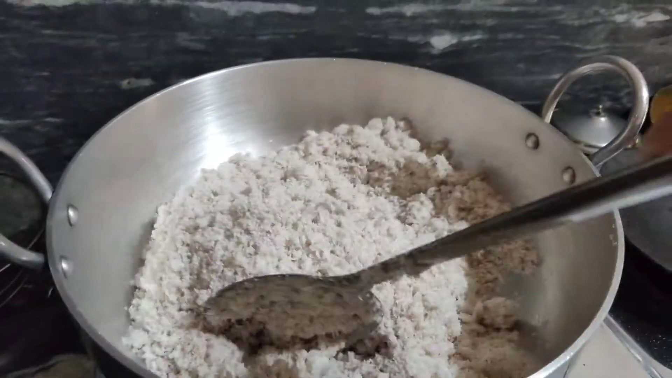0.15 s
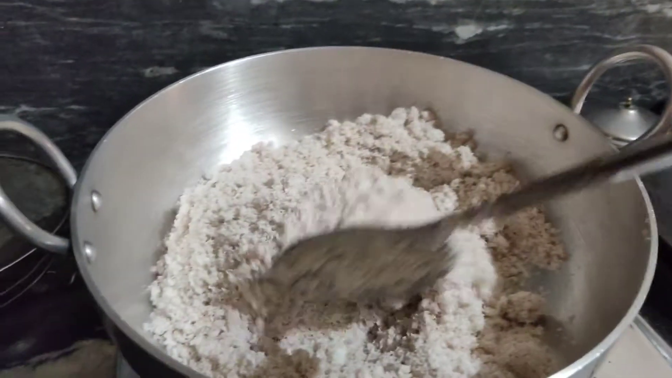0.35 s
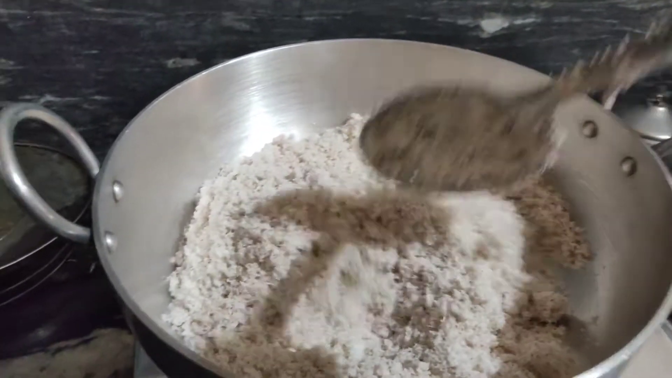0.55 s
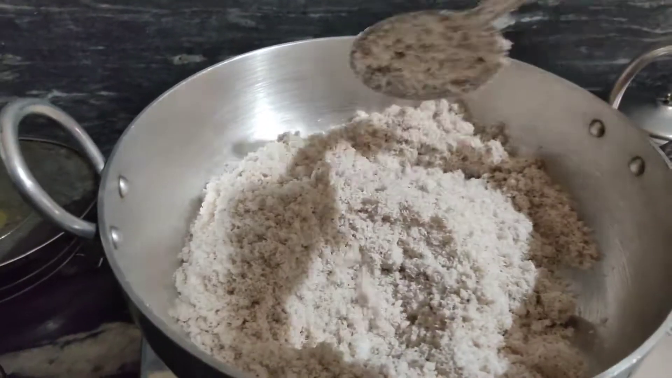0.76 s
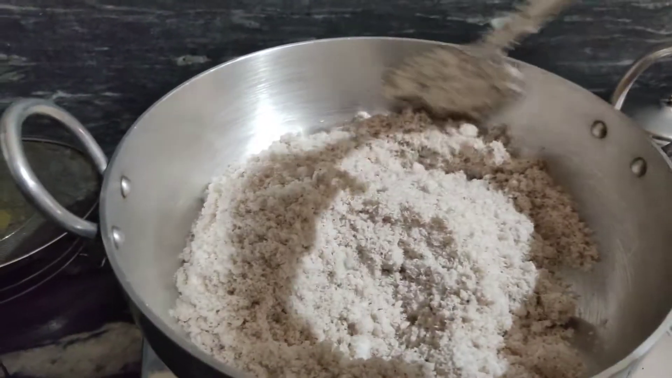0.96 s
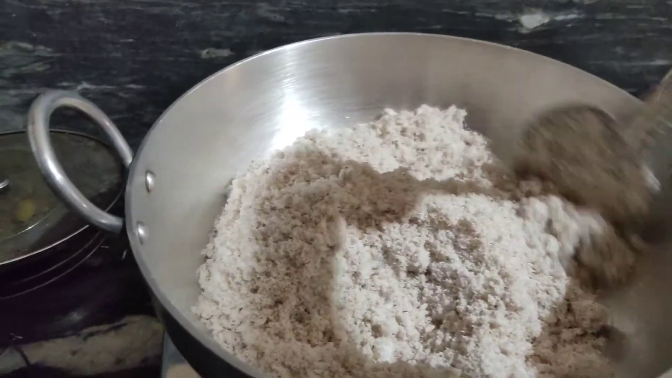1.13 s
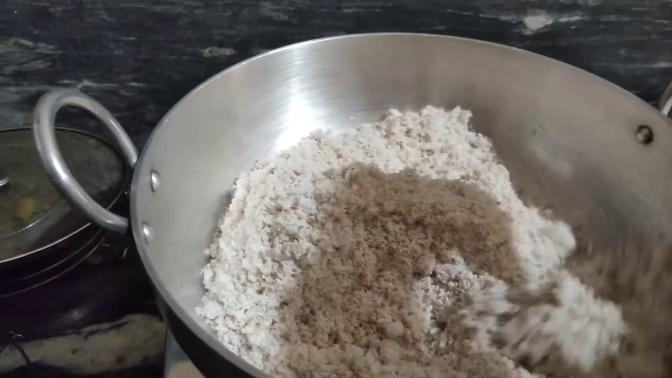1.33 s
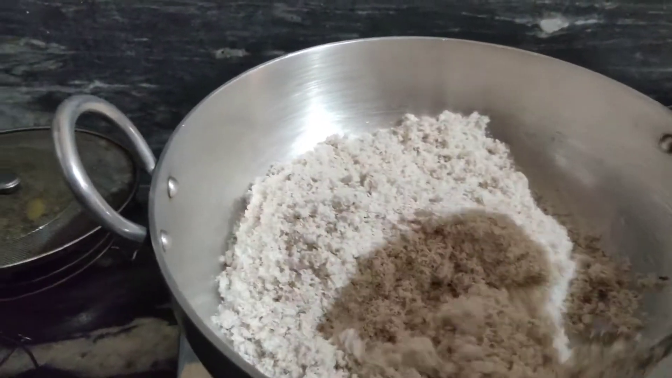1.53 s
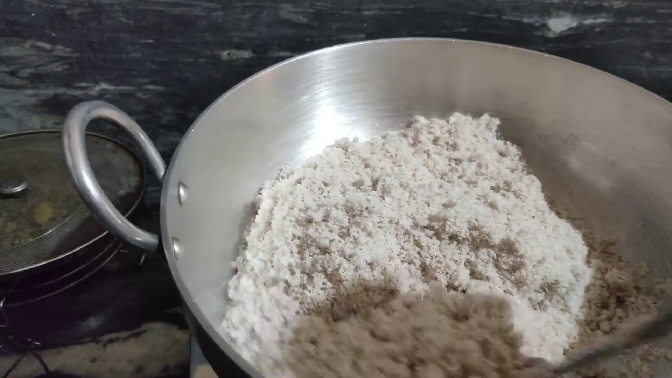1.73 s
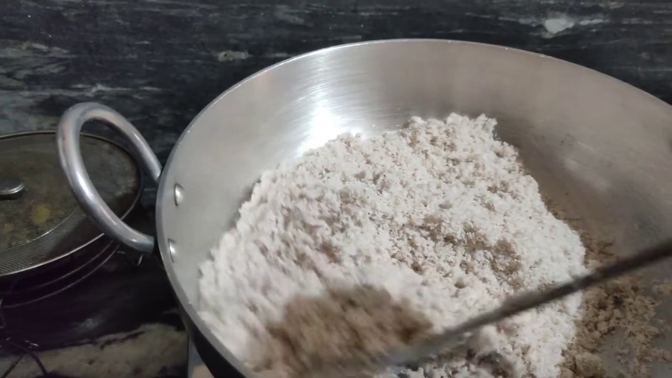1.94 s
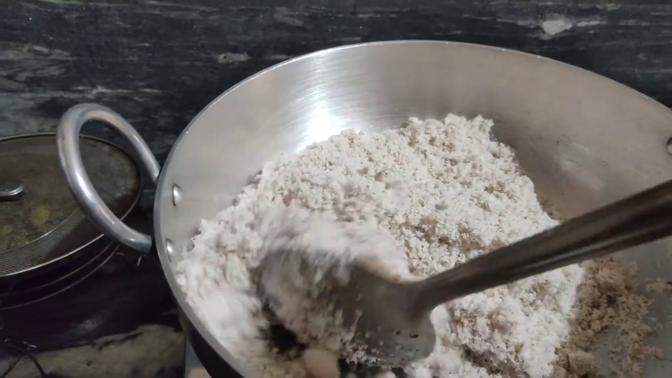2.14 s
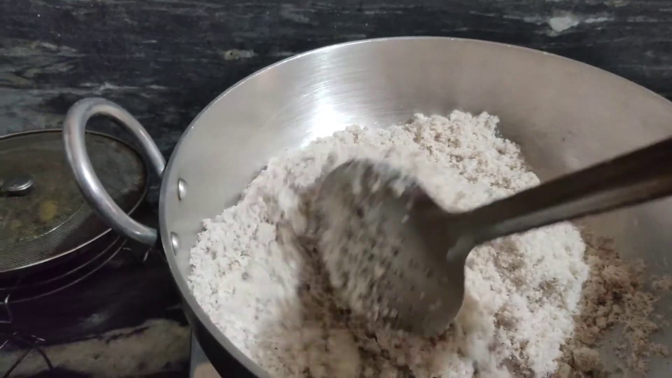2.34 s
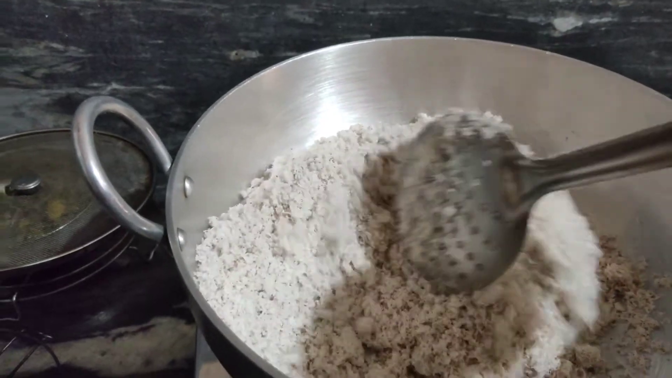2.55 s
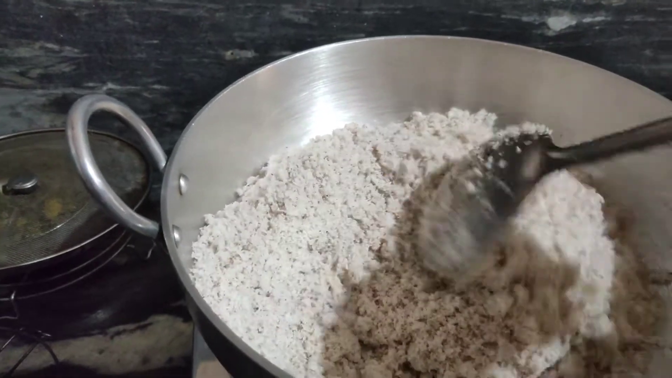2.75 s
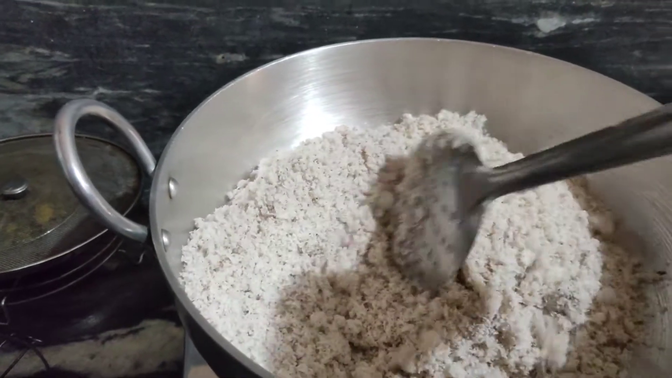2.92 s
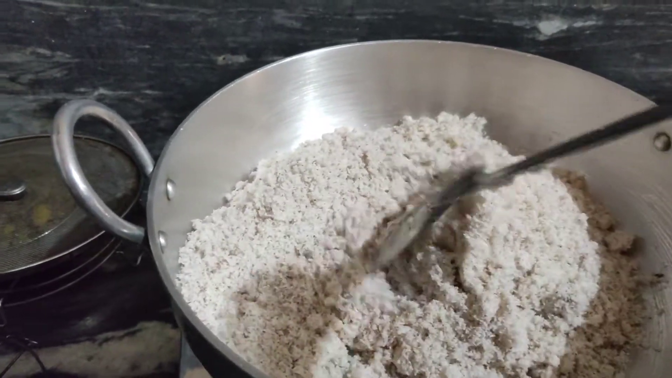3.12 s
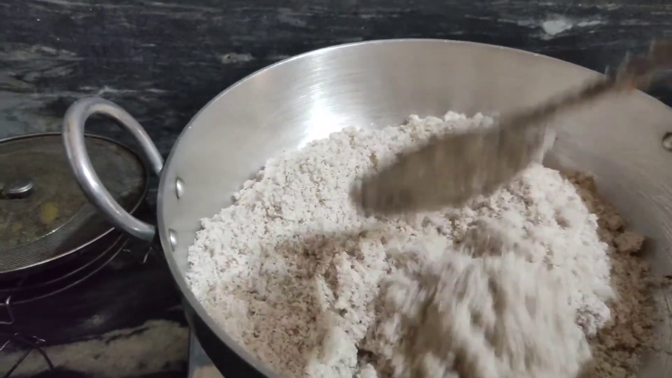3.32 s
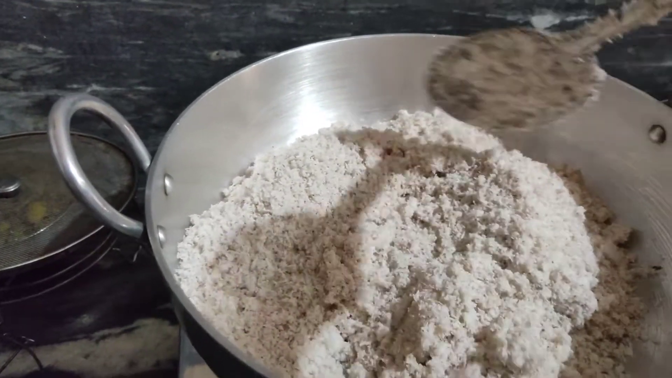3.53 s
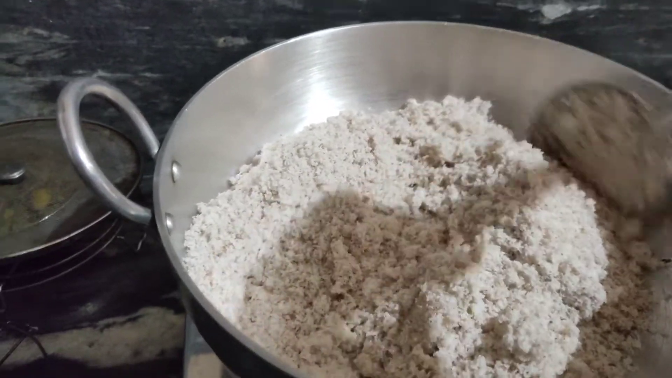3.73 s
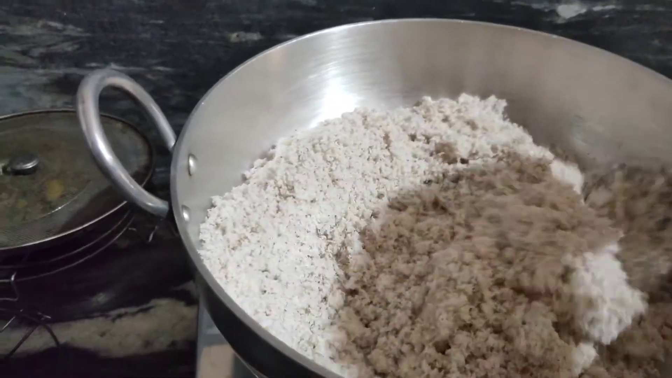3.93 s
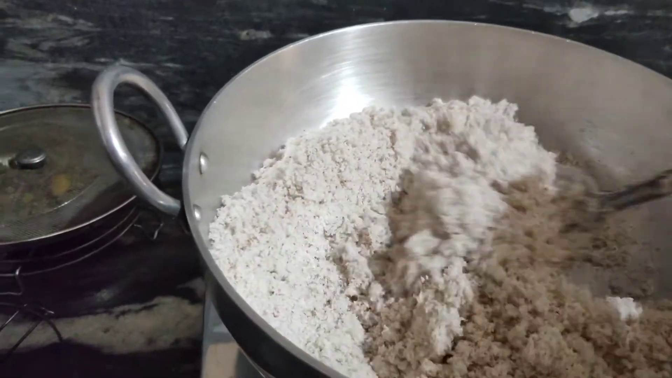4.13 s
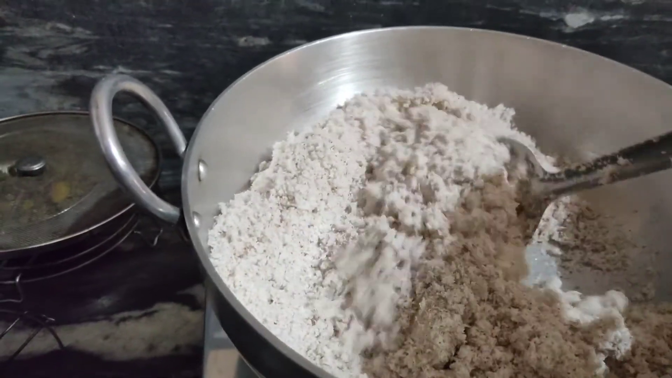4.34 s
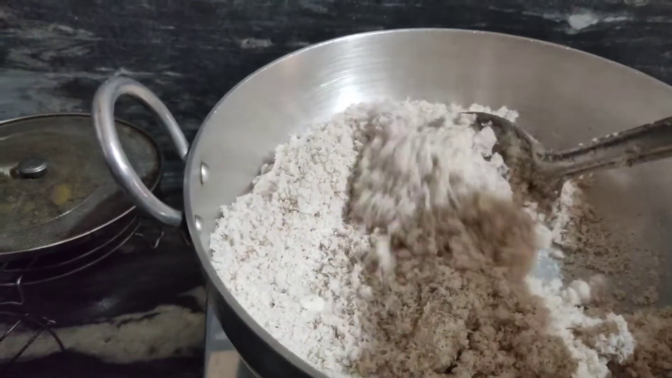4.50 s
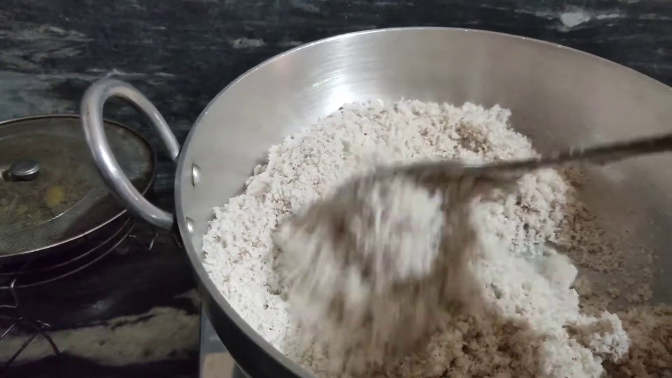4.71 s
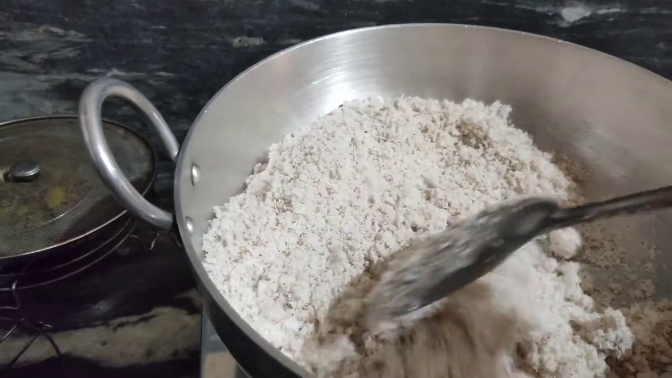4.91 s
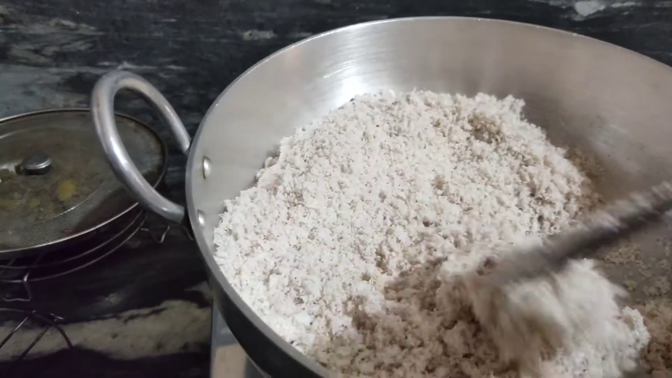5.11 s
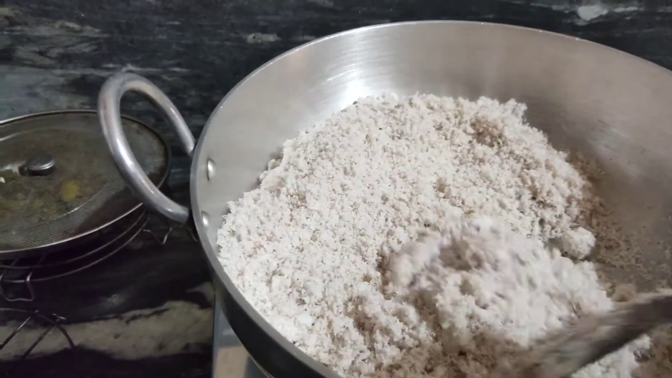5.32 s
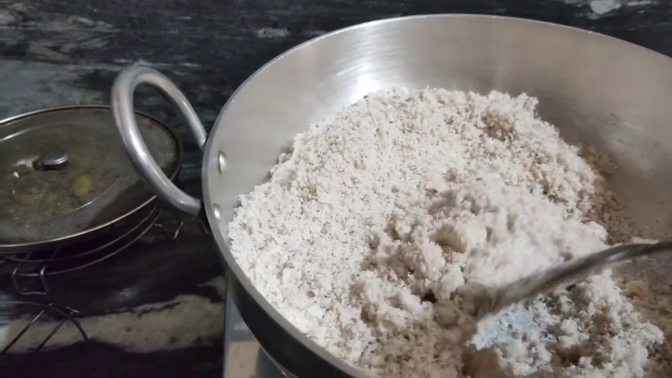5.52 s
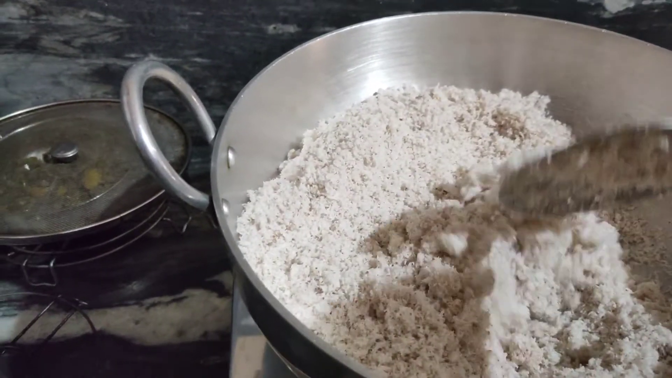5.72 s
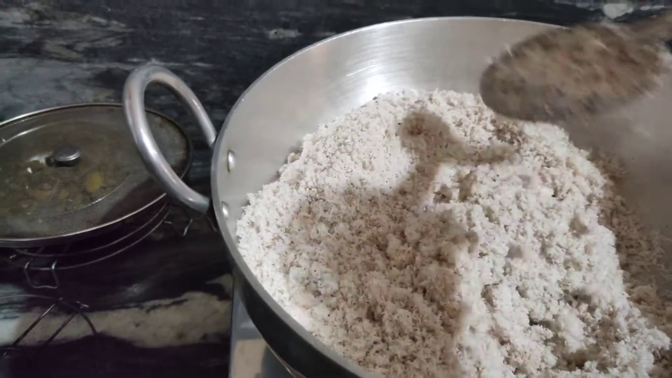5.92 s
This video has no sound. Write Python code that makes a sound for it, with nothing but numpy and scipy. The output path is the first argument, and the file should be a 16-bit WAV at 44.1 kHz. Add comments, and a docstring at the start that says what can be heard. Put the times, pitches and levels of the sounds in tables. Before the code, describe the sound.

Close stereo pickup in a small kitchen. Faint rumble and a tiny bright metallic tick come first, then the sound cuts out briefly. A rattling, gritty ladle scrape follows in a steel pan, then near quiet with soft crumb rustles. A much harder clang starts a second scraping burst with a short hum, and a smaller knock comes near the end.

```python
"""A small kitchen, close to a two-port microphone: a metal ladle knocks and scrapes a steel pan of dry crumbs.
Grit and knocks push noise through the resonances of the pan; hard blows add wide shudders and dull thuds.
A lip mode hums, a small ring ticks in decaying sines, and faint rustles are short swells of narrow noise.
Beneath lies a burner rumble of patchy low noise with a few wavering tones. The sound drops out once."""
import sys
import numpy as np
from scipy import signal
from scipy.io import wavfile
from scipy.ndimage import uniform_filter1d

SR = 44100
rng = np.random.default_rng(int(sys.argv[2]) if len(sys.argv) > 2 else 0)


def voltage_ratio(level):
    """Linear amplitude factor for a level in decibels (scalar or array-like)."""
    return 10 ** (np.asarray(level, float) / 20)


def wav_out(sig):
    """Save sig, one row per channel (or a flat mono array), as 16-bit PCM at SR to the path in sys.argv[1]."""
    wavfile.write(sys.argv[1], SR, np.round(np.clip(np.atleast_2d(sig).T, -1, 1) * 32767).astype(np.int16))


N = 262836
T = np.arange(N) / SR

# Borders between the six parts of the pan (base, bowl, wall, upper wall, rim, edge). Each entry: frequency in Hz.
PART_BORDERS_HZ = [830, 1650, 2750, 4250, 9300]


def evened(x):
    """Scales to rms 1."""
    return x / np.sqrt(np.mean(abs(x) ** 2) + 1e-20)


def read(points, hz):
    """Reads a table on a log-frequency axis."""
    f, value = np.transpose(points)
    return np.interp(np.log(hz + 1), np.log(f + 1), value)


def drift(per_s, count):
    """Slow random curves: straight lines between normal random knots, per_s of them a second."""
    knots = np.arange(0, T[-1] + 1, 1 / per_s)
    return np.array([np.interp(T, knots, row) for row in rng.standard_normal((count, len(knots)))])


def ring(x, hz, width):
    """A complex one-pole resonance that keeps the power of white noise."""
    r = np.exp(-np.pi * width / SR)
    return np.sqrt(1 - r * r) * signal.lfilter([1], [1, -r * np.exp(2j * np.pi * hz / SR)], x)


def ports(z, turn):
    """The two ports hear one vibration with a phase difference of turn radians."""
    return np.sqrt(2) * np.array([z.real, (z * np.exp(1j * turn)).real])


def coloured(points, lo_hz, hi_hz):
    """Causal filter taps of energy 1 for the part of a spectrum between two edges."""
    hz = abs(np.fft.fftfreq(4096, 1 / SR))
    outside_hz = np.maximum(np.maximum(lo_hz - hz, hz - hi_hz), 0)
    # past an edge the spectrum falls 1 dB every 4 Hz, by 50 dB at most
    log_gain = np.log(voltage_ratio(read(points, hz) - np.minimum(outside_hz / 4, 50)))
    # the Hilbert transform of the log gain gives the minimum phase
    taps = np.fft.ifft(np.exp(np.conj(signal.hilbert(log_gain)))).real[:2048]
    return taps / np.linalg.norm(taps)


def pan():
    """Each part rings its main modes, which wander in strength as the contact moves."""
    # Main modes of the steel pan. Each row: frequency in Hz, width in Hz, peak relative to its part in dB.
    pan_modes = [(287, 44, -5.5), (359.7, 37, -1.5), (416, 34, -0.5), (455, 25, 2.5), (518, 28, 1.5),
                 (557, 24, 0), (605, 31, -2.5), (685, 27, -6.5), (756, 38, -6.5), (890, 38, 2.5),
                 (939, 21, -2.5), (1047, 20, -6), (1152, 150, -3), (1216, 45, 0), (1298, 59, 3),
                 (1392, 74, -11.5), (2016, 120, -6), (2117, 67, -4), (2200, 65, -9), (2260, 69, -1),
                 (2560, 65, -4), (3172, 160, -6), (3450, 250, -5.5), (3520, 86, -8), (3700, 300, -8.5),
                 (3906, 120, -5), (4570, 90, -8), (4683, 71, -5), (4980, 200, -8), (5150, 60, -5.5),
                 (5320, 79, -8.5), (5770, 150, -5.5), (6160, 50, -9), (5830, 69, -9), (6060, 44, -6.5),
                 (6470, 61, -0.5), (6390, 140, -3), (6694, 89, 2.5), (6930, 60, -3.5), (7070, 140, -4),
                 (7180, 24, -4.5), (7030, 36, 0.5), (7250, 48, -8), (7540, 56, -1), (7600, 37, -18.5),
                 (8230, 79, -7.5), (8760, 48, -12), (8980, 59, -17)]
    skirt = 3.5  # width of the second resonance, in mode widths: how far the flanks reach
    force = contact()
    out = patchy(thicket(force))
    part = np.searchsorted(PART_BORDERS_HZ, [hz for hz, *_ in pan_modes])
    power = np.array([width * voltage_ratio(db) ** 2 for _, width, db in pan_modes])
    wander = voltage_ratio(1.7 * drift(9.0, count=len(pan_modes)))
    # phase between the ports in radians, leading or lagging, wandering too
    sides = rng.choice([-1., 1.], len(pan_modes))[:, None] * 1.63
    sides = sides + 0.95 * drift(12.0, count=len(pan_modes))
    for (hz, width, db), k, p, w, side in zip(pan_modes, part, power, wander, sides):
        mode = ring(force[k] * w, hz, width)
        steep = ring(mode, hz, skirt * width) * np.sqrt(np.pi * 1.6 * width / SR)
        share = p / power[part == k].sum()
        out += np.sqrt(share) * ports(steep, side * min(hz / 1100, 1))  # low modes differ less
    return out * voltage_ratio([[-.3], [.3]])


def contact():
    """Force on each part of the pan: uneven grains under each stroke, a blow and a short chatter at each knock."""
    # Strokes of the ladle, one table a stroke: how hard the grit rings the low, middle and high modes.
    # Each row: time in seconds, base level in dB, bowl level in dB, rim level in dB.
    strokes = [
        [(0.85, -95, -100, -105), (0.93, -104, -100, -84), (0.99, -111, -104, -86), (1.06, -78, -96, -72.5)],
        [(1.16, -71, -74.5, -62), (1.2, -63.5, -74, -73.5), (1.296, -50.5, -80, -68), (1.33, -53.5, -58, -53.5),
         (1.506, -55, -51.5, -46.5), (1.544, -59, -63, -53.5), (1.734, -65.5, -68.5, -62),
         (1.82, -85, -103, -68), (1.876, -60.5, -70.5, -63), (2.026, -59.5, -110, -64),
         (2.064, -58, -64.5, -66), (2.11, -66.5, -83.5, -65), (2.176, -74.5, -105, -71),
         (2.23, -80.5, -110, -91)],
        [(3.81, -45, -38, -51.5), (3.83, -48, -44.5, -48), (4.014, -56, -63.5, -62.5), (4.044, -54, -53.5, -49),
         (4.068, -53.5, -57.5, -56.5), (4.2, -59, -60, -58), (4.306, -51.5, -46.5, -53),
         (4.35, -49, -50.5, -59.5), (4.375, -43, -45.5, -62), (4.442, -49.5, -61, -67.5),
         (4.526, -59, -66.5, -82), (4.66, -66, -98, -115), (4.75, -76, -110, -110)],
        [(5.51, -52, -56, -71.5), (5.548, -50, -61, -66), (5.644, -65.5, -76, -103), (5.68, -63, -94, -105)],
    ]
    # Knocks and judders of the ladle.
    # Each row: time in seconds, base level in dB, rim level in dB, 1/e fade of the chatter in seconds.
    knocks = [(1.161, -66, -84, 0.00076), (1.264, -41, -84, 0.0059), (1.313, -65, -46, 0.0077),
              (1.333, -46, -41, 0.0059), (1.338, -50, -46, 0.0095), (1.388, -60, -41.5, 0.0062),
              (1.395, -44.5, -37, 0.0051), (1.422, -44, -44, 0.01), (1.433, -46, -38.5, 0.0029),
              (1.463, -59, -43, 0.002), (1.482, -68, -37, 0.0035), (1.497, -45, -42, 0.0087),
              (1.559, -52, -47, 0.0034), (1.567, -60, -48, 0.004), (1.611, -61, -45.5, 0.0049),
              (1.709, -53, -51.5, 0.0034), (2.051, -37, -84, 0.0018), (3.808, -31, -24, 0.0017),
              (3.833, -47, -34.5, 0.0045), (4.026, -46.5, -49.5, 0.014), (4.042, -45, -61, 0.0038),
              (4.268, -39, -46.5, 0.0046), (4.368, -34.5, -87.5, 0.005), (5.509, -39.5, -58.5, 0.014),
              (5.519, -57.5, -59, 0.01)]
    # How a knock reaches the bowl: share of the way from base to rim level, offset in dB.
    bowl_share, bowl_offset_db = (0.49, -7)
    grains_per_s = 1600
    size = voltage_ratio(3.1 * np.minimum(rng.exponential(1, N), 4))
    grains = size * (rng.random(N) < grains_per_s / SR) * rng.choice([-1., 1.], N)
    grit = evened(evened(grains) + 0.32 * rng.standard_normal(N))
    grit *= voltage_ratio(0.47 * drift(60.0, count=1)[0])  # the ladle sticks and slips
    force = np.zeros((len(PART_BORDERS_HZ) + 1, N))
    for rows in strokes:
        s, *levels = np.transpose(rows)
        force += parts(*(np.interp(T, s, db, -200, -200) for db in levels)) * grit
    t = np.arange(3000) / SR
    for s, base, rim, fade_s in knocks:
        blow = 6.9 * (t == 0)
        burst = rng.standard_normal(len(t)) * np.exp(-t / max(fade_s, 1e-4)) + blow
        bowl = base + bowl_share * (rim - base) + bowl_offset_db
        gains = parts(base, bowl, rim, wall_db=0.5)  # a knock shakes the wall more than grit does
        at = round(s * SR)
        force[:, at:at + len(t)] += gains[:, None] * burst
    return force


def parts(base, bowl, rim, wall_db=0):
    """Gains of all six parts of the pan from three levels in dB."""
    # Wall and upper wall follow bowl and rim; edge follows rim and falls slightly as bowl rises.
    # Each row: slope in dB per bowl dB, slope in dB per rim dB, level in dB when bowl and rim are at the middle level.
    followers = [(0.9741, 0.2372, -65.5), (0.46, 0.69, -73), (-0.2925, 1.3271, -74.5)]
    middle_db = -60
    wall, upper, edge = (a * (bowl - middle_db) + b * (rim - middle_db) + db for a, b, db in followers)
    return voltage_ratio(np.array([base, bowl, wall + wall_db, upper + wall_db, rim, edge]))


def thicket(force):
    """Many lesser modes as short noisy tails; three sets take turns as the ladle moves round the pan."""
    # Spectrum of the lesser modes between the main ones. Each row: frequency in Hz, relative density in dB per Hz.
    lesser_modes = [(120, -29.5), (250, -8), (600, -6), (1300, -13.5), (1520, -44.5), (1640, -36),
                    (1760, -42.5), (2050, -29.5), (2450, -23.5), (2620, -38.5), (2770, -36.5),
                    (3050, -28.5), (3400, -45), (3700, -35.5), (4050, -37.5), (4220, -65.5), (4400, -35),
                    (4600, -37), (4860, -48), (5150, -25.5), (5500, -34.5), (5800, -24), (6880, -29.5),
                    (7700, -33), (8100, -37), (8500, -33.5), (10000, -42), (16000, -46)]
    part_db = (-11.5, -15.5, -5.0, -3.5, -6.0, -1.5)
    drive = np.zeros(N)
    for f, lo, hi, db in zip(force, [0] + PART_BORDERS_HZ, PART_BORDERS_HZ + [SR], part_db):
        drive += voltage_ratio(db) * signal.oaconvolve(f, coloured(lesser_modes, lo, hi))[:N]
    t, out = np.arange(6000) / SR, np.zeros((2, N))
    fade = voltage_ratio(-60 * t / 0.17) + 0.69 * voltage_ratio(-60 * t / 0.0073)  # a slow and a fast t60, in seconds
    for k in range(3):
        shared, *own = rng.standard_normal((3, len(t))) * fade
        tails = 0.17 * shared + own
        turn = np.sqrt(2 / 3) * np.cos(np.pi * (4.0 * T + k / 3))
        out += signal.oaconvolve((drive * turn)[None], tails / np.linalg.norm(tails[0]), axes=1)[:, :N]
    return out


def patchy(x):
    """Above 1400 Hz, random patches about 170 Hz wide and 70 ms long rise and sink."""
    hz, t, z = signal.stft(x, SR, nperseg=1024, noverlap=768)
    field = rng.standard_normal((len(t), len(hz))).T
    for _ in range(2):
        field = uniform_filter1d(uniform_filter1d(field, 3, 0), 10, 1)
    gain = evened(voltage_ratio(5.5 * evened(field)))  # patch depth 5.5 dB rms
    z = z * np.where((hz > 1400)[:, None], gain, 1)
    return signal.istft(z, SR, nperseg=1024, noverlap=768)[1][:, :N]


def thuds():
    """Dull thuds muffled by the crumbs: soft-edged bursts of a few cycles that sag in pitch."""
    # Each row: start in seconds, length in seconds, starting pitch in Hz, peak in dB ahead of the port balance.
    thud_rows = [(3.808, 0.0062, 580, -33), (3.831, 0.0084, 342, -34), (4.367, .012, 810, -33.5),
                 (4.377, 0.013, 435, -35), (4.386, 0.0092, 707, -38), (5.51, 0.017, 566, -40),
                 (5.533, 0.01, 874, -44)]
    sag = .3  # share of the pitch lost by the end
    out = np.zeros((2, N))
    for s, length, hz, db in thud_rows:
        u = np.arange(0, length, 1 / SR) / length
        z = np.sin(np.pi * u ** 0.84) * np.exp(2j * np.pi * np.cumsum(hz * (1 - sag * u)) / SR)
        at = round(s * SR)
        out[:, at:at + len(u)] += voltage_ratio(db) * ports(1j * z, 1.0) / np.sqrt(2)
    return out * voltage_ratio([[-1.5], [1.5]])


def shudder():
    """Hard blows shake every mode at once: wide dying noise, its low part somewhat alike in both ports."""
    # Each row: time in seconds, low-part level in dB, high-part level in dB, t60 in seconds.
    blows = [(3.81, -37, -43.5, 0.37), (3.833, -47.5, -49, 0.3), (4.3, -61, -58, 0.41),
             (4.368, -49.5, -58.5, 0.39), (5.514, -55, -62, 0.33)]
    # Spectrum of the shaken pan. Each row: frequency in Hz, relative density in dB per Hz.
    shaken = [(120, -17), (280, 1.5), (700, 0.5), (1250, -5), (1400, -9.5), (1500, -1), (1750, 1.5),
              (1900, -3.5), (2800, -1), (3400, 0), (3800, -15), (4250, -12), (4700, -3.5), (5800, 0),
              (7200, -4), (9000, -13.5), (15000, -26.5)]
    split_hz = 1450
    out = np.zeros((2, N))
    for k, edges in enumerate([(0, split_hz), (split_hz, SR)]):
        shape = sum((T > s) * voltage_ratio(db[k] - 60 * np.maximum(T - s, 0) / t60) for s, *db, t60 in blows)
        shared, *own = rng.standard_normal((3, N))
        noise = evened(own + 0.75 * (1 - k) * shared)
        out += signal.oaconvolve(shape * noise, coloured(shaken, *edges)[None], axes=1)[:, :N]
    return out


def hum():
    """One clean mode: the free lip of the pan hums after a blow until the ladle damps it."""
    # Each row: time in seconds, pitch in Hz, level in dB ahead of smoothing and the port balance.
    lip_path = [(3.85, 449, -43), (3.904, 455.7, -40.5), (4.146, 457.4, -50), (4.31, 460, -52),
                (4.34, 445, -69)]
    s, hz, db = np.transpose(lip_path)
    level = uniform_filter1d(voltage_ratio(np.interp(T, s, db, -200, -200)), 400)
    phase = 2 * np.pi * np.cumsum(np.interp(T, s, hz)) / SR
    return ports(level * np.exp(1j * phase), 0.7) * voltage_ratio([[-3], [2]])


def clink():
    """A small metal ring ticks twice: a bright crack of noise, then high modes dying away."""
    # The two ticks. Each row: time in seconds, level in dB.
    ring_ticks = [(0.418, -54.5), (0.426, -45)]
    # Modes of the small ring. Each row: frequency in Hz, level relative to the tick in dB, t60 in seconds.
    ring_modes = [(5125, -50, 0.18), (6080, -26.5, 0.24), (6160, -13.5, 0.08), (8280, -32, 0.26),
                  (8220, -25, 0.11), (9780, -26, 0.12), (10000, -29, 0.23), (10960, -40, 0.15),
                  (11600, -32, 0.25), (11750, -33, 0.15), (14400, -9.5, 0.17), (14470, -27, 0.17),
                  (15360, -31, 0.06), (15700, -43, 0.07)]
    crack_db, crack_hz, crack_t60 = -17, 9000, .03  # level relative to the tick, low edge, seconds
    high = signal.butter(4, crack_hz, 'high', fs=SR, output='sos')
    out = np.zeros((2, N))
    for s, blow_db in ring_ticks:
        t = np.maximum(T - s, 0)
        crack = signal.sosfilt(high, rng.standard_normal((2, N)))
        out += (T > s) * voltage_ratio(blow_db + crack_db - 60 * t / crack_t60) * crack
        for hz, db, t60 in ring_modes:
            fade = (T > s) * voltage_ratio(blow_db + db - 60 * t / t60)
            z = fade * np.exp(2j * np.pi * (hz * t + rng.random()))
            out += ports(z * np.minimum(t / 0.0022, 1), 1.3)  # 2.2 ms rise
    return out


def rustles():
    """Short uneven swells of narrow noise; the lower, the more alike the ports."""
    # Short faint swells of noise in narrow bands.
    # Each row: start in seconds, length in seconds, frequency in Hz, width of each of two resonances in Hz,
    # level in dB ahead of the swell shape.
    faint_swells = [(0, 0.15, 1168, 11, -68), (0.167, 0.21, 3020, 250, -79.5), (0.156, 0.19, 2524, 87, -83),
                    (0.264, 0.11, 1172, 38, -78), (0.369, 0.24, 1166, 82, -72.5),
                    (0.611, 0.27, 1196, 72, -80), (0.783, 0.11, 1536, 65, -88),
                    (0.895, 0.13, 2120, 350, -88), (0.998, 0.32, 2770, 740, -72.5),
                    (1.163, 0.044, 249, 140, -48.5), (1.164, 0.12, 2700, 810, -78),
                    (1.4, 0.23, 3520, 79, -63), (1.4, 0.2, 3320, 84, -66.5), (1.408, 0.13, 4440, 150, -63),
                    (1.385, 0.23, 7030, 69, -51), (1.839, 0.4, 3886, 180, -72.5),
                    (1.852, 0.45, 2353, 120, -80), (1.867, 0.33, 1290, 60, -69),
                    (2.695, 0.24, 3656, 83, -70.5), (2.705, 0.23, 3495, 135, -76.5),
                    (2.897, 0.32, 9460, 65, -95.5), (3.087, 0.25, 7000, 220, -77.5),
                    (3.226, 0.18, 7800, 440, -75.5), (2.941, 0.091, 1150, 31, -76.5),
                    (3.546, 0.29, 1332, 75, -73.5), (3.8, 0.19, 1700, 370, -62),
                    (3.963, 0.19, 1600, 180, -75), (4.142, 0.42, 1730, 360, -59),
                    (4.07, 0.47, 6570, 200, -83), (3.84, 0.22, 148.9, 15, -49.5),
                    (4.076, 0.45, 1298, 11, -54.5), (4.246, 0.17, 1307, 40, -46.5),
                    (4.3, 0.081, 1170, 62, -43), (4.381, 0.069, 1390, 330, -52),
                    (4.415, 0.19, 3620, 620, -67), (4.501, 0.18, 3570, 120, -77),
                    (4.642, 0.1, 1682, 59, -78), (4.66, 0.05, 2790, 84, -92), (4.655, 0.05, 2140, 220, -87),
                    (4.781, 0.016, 2620, 170, -91.5), (4.825, 0.016, 2610, 150, -85.5),
                    (4.926, 0.018, 1940, 120, -82.5), (4.968, 0.012, 1920, 140, -89.5),
                    (4.981, 0.016, 4700, 220, -90), (5.124, 0.094, 1174, 24, -75),
                    (5.253, 0.096, 715, 135, -70.5)]
    # Light taps that ring one high band.
    # Each row: start in seconds, level in dB ahead of the shape, frequency in Hz, width of each resonance in Hz.
    taps = [(0.808, -97, 6700, 330), (2.075, -63.5, 6400, 200), (2.093, -67, 6400, 500),
            (2.735, -89.5, 5620, 112), (2.734, -86, 6830, 108), (2.881, -89.5, 6800, 90.6),
            (3.012, -88, 5640, 100), (3.329, -74, 6270, 332), (5.689, -71.5, 6400, 338)]
    # Crumbs slide softly off the ladle.
    # Each row: start in seconds, length in seconds, level in dB, brightness in dB per octave.
    slides = [(0.055, 0.25, -86, -24), (2.487, 0.23, -75, 12), (3.067, 0.39, -81, -6),
              (3.222, 0.21, -85.5, -4)]
    # Bands of a slide. Each row: frequency in Hz, width of each resonance in Hz, level relative to the slide in dB.
    slide_bands = [(5294, 170, -13), (6390, 120, -11.5), (6830, 89, -2), (7570, 220, -5), (8000, 310, -6.5),
                   (8700, 500, -8.5), (9470, 380, -10)]
    swell_rise, short_rise, tap_rise = 0.15, 0.04, 0.02  # shares of the length
    tap_s, tap_fall = 0.12, 2.9  # length in seconds, power of the fade
    alike_hz = 395  # well below this the ports hear nearly the same swell
    out = np.zeros((2, N))
    rows = [(*row, swell_rise if row[1] > .095 else short_rise, 1) for row in faint_swells]
    rows += [(s, tap_s, hz, width, db, tap_rise, tap_fall) for s, db, hz, width in taps]
    pivot_hz = slide_bands[3][0]  # the brightness tilts about this band
    for s, length, db, tilt in slides:
        for hz, width, band_db in slide_bands:
            level_db = db + band_db + tilt * np.log2(hz / pivot_hz)
            rows.append((s, length, hz, width, level_db, swell_rise, 1))
    for s, length, hz, width, db, rise, fall in rows:
        at, size = round(s * SR), round(length * SR)
        a, b = rng.standard_normal((2, SR // 2))[:, :size + 6000]  # the extra lets the resonances settle
        right = a + (hz / alike_hz) * b
        narrow = np.array([evened(ring(ring(x, hz, width), hz, width).real)[-size:] for x in (a, right)])
        u = np.arange(size) / size
        # each tap starts with a short spike
        head = 1 + (fall > 1) * voltage_ratio(13) * np.exp(-u * length / 0.0027)
        # above 2 kHz the level flickers, with 30 random knots a second
        flicker_db = 5 * np.interp(u * length * 30, np.arange(20), rng.standard_normal(20)) * (hz > 2000)
        shape = head * np.minimum(u / rise, 1) * (1 - u) ** fall
        out[:, at:at + size] += voltage_ratio(db + flicker_db) * narrow * shape
    return out


def kitchen(x):
    """Room tail: sparse taps of random sign, each band dying at its own speed."""
    # Decay of the room. Each row: frequency in Hz, t60 in seconds.
    room_decay = [(250, 0.44), (1000, 0.15), (4000, 0.34), (12000, 0.36)]
    taps = np.zeros((2, SR // 2))
    # one tap in every 20 samples
    at = np.arange(200, SR // 2 - 20, 20) + rng.integers(0, 20, (2, (SR // 2 - 201) // 20))
    np.put_along_axis(taps, at, rng.choice([-1., 1.], at.shape), 1)
    hz, t, z = signal.stft(taps, SR, nperseg=256)
    tail = signal.istft(z * voltage_ratio(-60 * t / read(room_decay, hz)[:, None]), SR, nperseg=256)[1]
    return signal.fftconvolve(x.mean(0)[None], tail / np.linalg.norm(tail[0]), axes=1)[:, :N]


def rumble():
    """Low burner rumble: patchy low noise with a thin hiss above, and a few wavering tones."""
    # Spectrum of the rumble. Each row: frequency in Hz, relative density in dB per Hz.
    rumble_shape = [(30, -47.5), (42, -9.5), (70, -11.5), (110, -1.5), (150, -2.5), (215, -17), (285, -6),
                    (388, -11.5), (527, -9), (642, -31), (718, -38.5), (3340, -45), (4060, -50),
                    (6720, -46), (8410, -53.5), (15500, -47.5)]
    # How alike the ports hear it. Each row: frequency in Hz, correlation from -1 to 1.
    alike = [(60, 1), (180, 0.78), (550, 0.54), (1650, -0.41), (4970, -0.0076), (15000, -0.38)]
    # How it leans to the left port. Each row: frequency in Hz, left over right in dB.
    left_lean = [(60, -2), (180, 1.5), (550, -6.5), (1650, 2.5), (4970, -0.5), (15000, 3)]
    # Wavering low tones. Each row: frequency in Hz, level in dB ahead of the swell.
    low_tones = [(48.4, -72.5), (102.3, -70.5), (145.3, -71.5)]
    # The rumble swells and sinks. Each row: time in seconds, gain in dB.
    swell = [(0.0, -3.5), (0.699, -3.5), (1.1, -2), (1.66, 3), (2.17, -1), (2.271, -2.5), (2.45, -0.5),
             (3.7, -1.5), (3.971, 1.5), (4.45, 6), (5.24, -2.5), (5.96, -1)]
    frames, hz = N // 512 + 5, np.fft.rfftfreq(2048, 1 / SR)
    a, b, c, d, patches = rng.standard_normal((frames, len(hz), 5)).T
    patches = evened(uniform_filter1d(uniform_filter1d(patches, 4, 0), 3, 1))
    same = np.clip(read(alike, hz), -1, 1)[:, None]
    left = a + 1j * b
    right = same * left + np.sqrt(1 - same ** 2) * (c + 1j * d)
    lean = voltage_ratio(read(left_lean, hz) / 2)[:, None]
    level_db = read(rumble_shape, hz)[:, None]
    patch_db = 2.9 * patches * (hz < 700)[:, None]
    z = np.array([left * lean, right / lean]) * voltage_ratio(level_db) * voltage_ratio(patch_db)
    noise = voltage_ratio(-62.5) * evened(signal.istft(z, nperseg=2048, noverlap=1536)[1][:, :N])
    tones = np.zeros(N)
    for f, db in low_tones:
        narrow = ring(ring(rng.standard_normal(N), f, f / 25), f, f / 6).real
        tones += voltage_ratio(db) * evened(narrow)
    s, db = np.transpose(swell)
    return (noise + tones) * voltage_ratio(np.interp(T, s, db))


def scene():
    """Pan and thuds with their room tail, the other metal sounds and rustles, over the rumble."""
    metal = pan() + thuds()
    return metal + voltage_ratio(-16.5) * kitchen(metal) + shudder() + clink() + hum() + rustles() + rumble()


def band_thinning(x, under_db=6.0, sink=4.0, loud_db=-99):
    """While the treble is above loud_db, narrow bands well below their neighbours sink further."""
    hz, t, z = signal.stft(x, SR, nperseg=1024, noverlap=768)
    power = uniform_filter1d(uniform_filter1d((abs(z) ** 2).mean(0), 3, 0), 10, 1)
    wide = uniform_filter1d(power, 22, 0)
    near_db, wide_db = (10 * np.log10(abs(p) + 1e-20) for p in (power, wide))
    treble = power[(hz > 4000) & (hz < 8000)].mean(0)
    loud = 10 * np.log10(abs(treble) + 1e-20) > loud_db
    # sink: dB of cut for each dB a band lies more than under_db below its neighbours
    cut_db = sink * np.clip(wide_db - near_db - under_db, 0, 12) * loud * (hz > 1400)[:, None]
    return signal.istft(z * voltage_ratio(-cut_db), SR, nperseg=1024, noverlap=768)[1][:, :N]


def band_limit(x):
    """A steep low-pass at the top of the band."""
    return signal.sosfilt(signal.butter(12, 16480, fs=SR, output="sos"), x)


def record(dry):
    """Thinning of weak narrow bands, a brief dropout, then the band limit at 16.3 kHz."""
    # Gain around the dropout, held before the first row and after the last. Each row: time in seconds, gain in dB.
    dropout = [(1.054, 4.5), (1.053, -58), (1.066, -46), (1.07, -97), (1.16, -90), (1.162, 2.5)]
    s, db = np.transpose(dropout)
    x = band_thinning(dry) * voltage_ratio(np.interp(T, s, db))
    low_pass = signal.firwin(511, 16300, window=("kaiser", 9), fs=SR)
    mix = signal.oaconvolve(x, low_pass[None], "same")
    return band_limit(mix)


dry = scene()
out = record(dry)
wav_out(out)
```